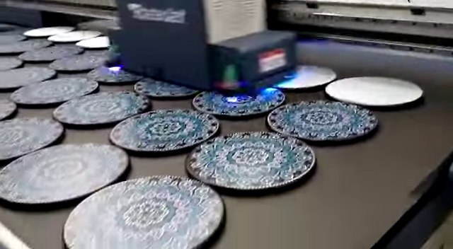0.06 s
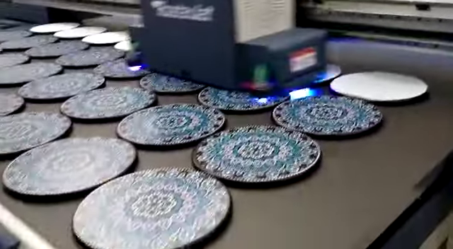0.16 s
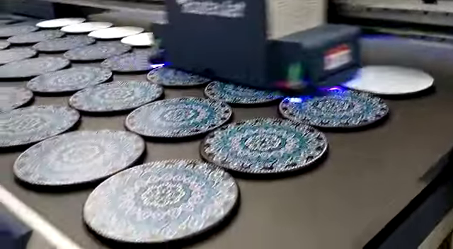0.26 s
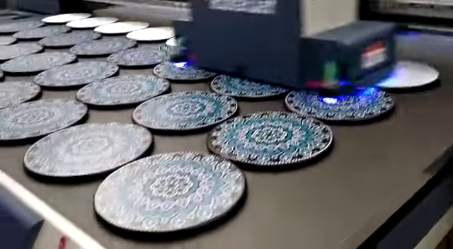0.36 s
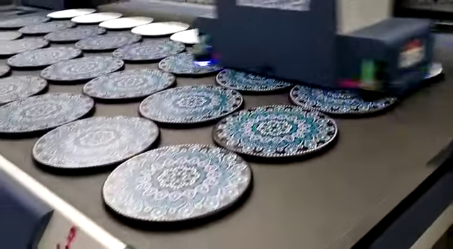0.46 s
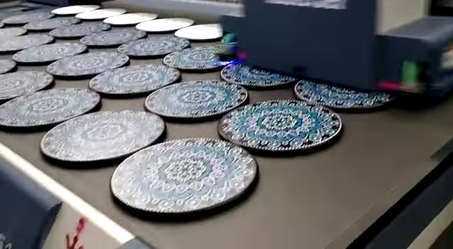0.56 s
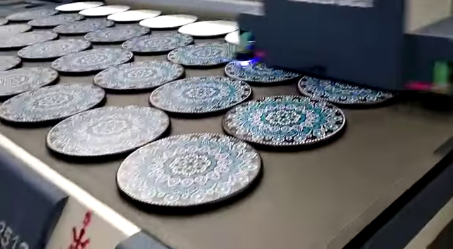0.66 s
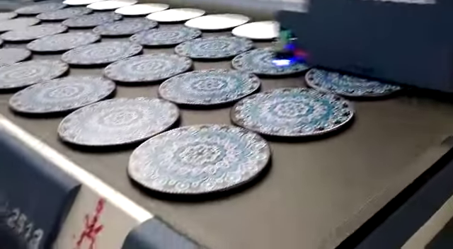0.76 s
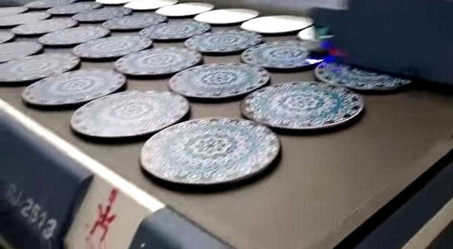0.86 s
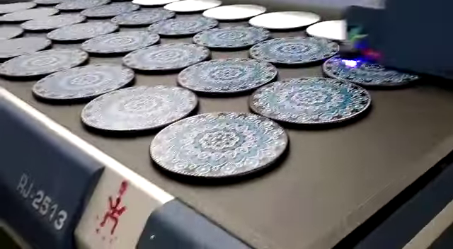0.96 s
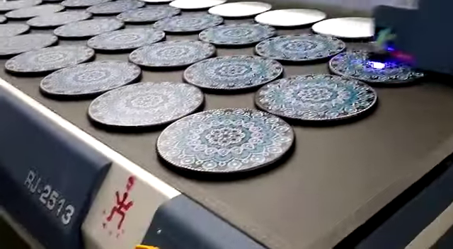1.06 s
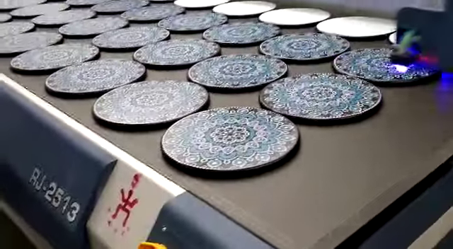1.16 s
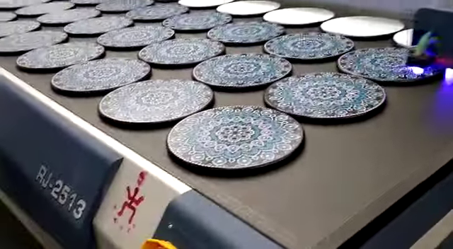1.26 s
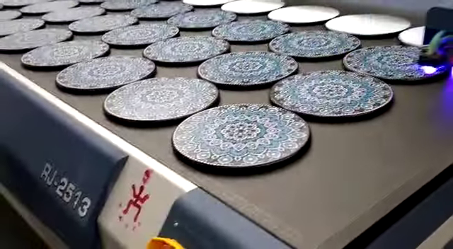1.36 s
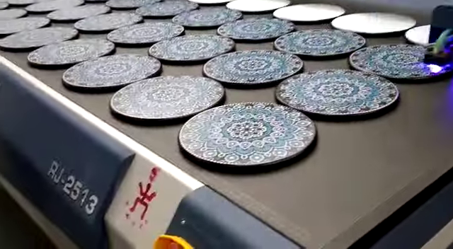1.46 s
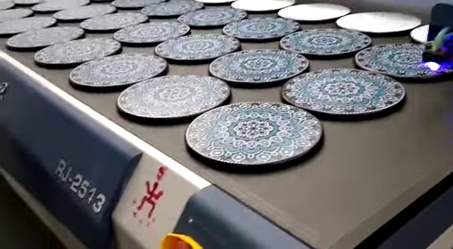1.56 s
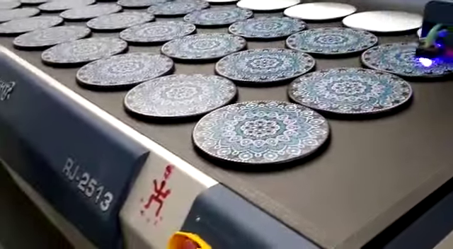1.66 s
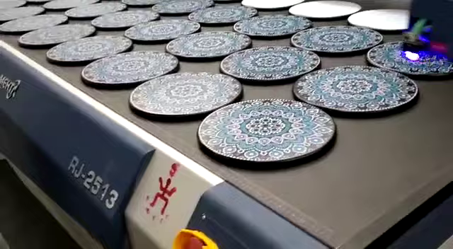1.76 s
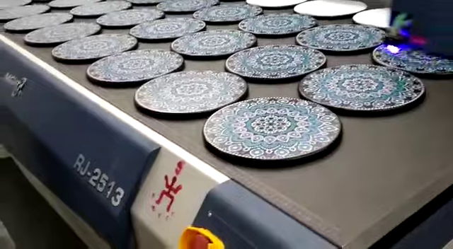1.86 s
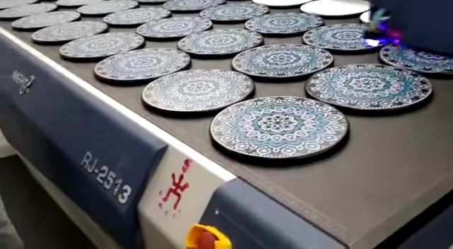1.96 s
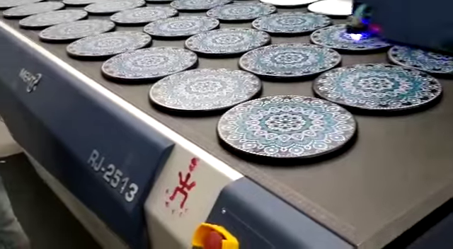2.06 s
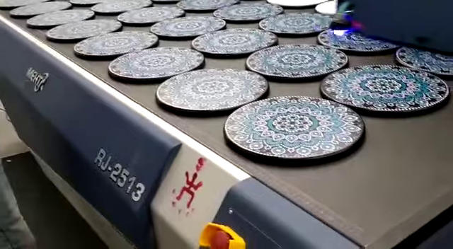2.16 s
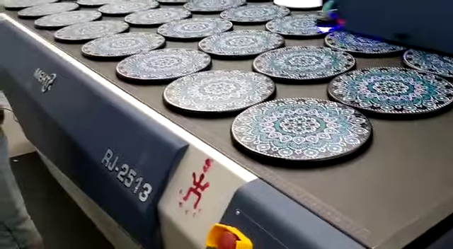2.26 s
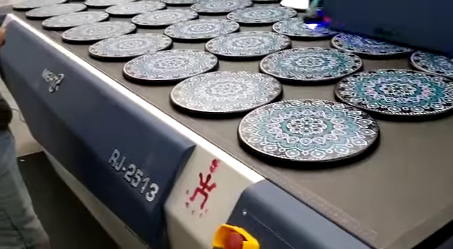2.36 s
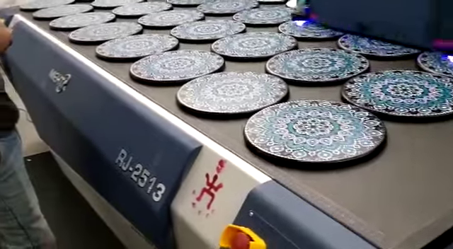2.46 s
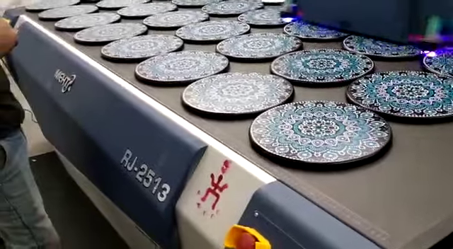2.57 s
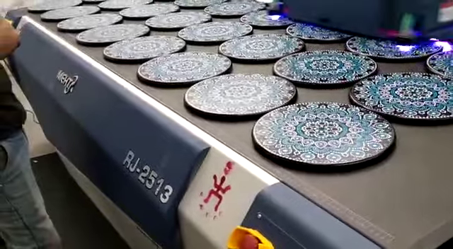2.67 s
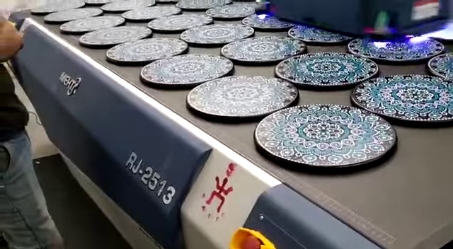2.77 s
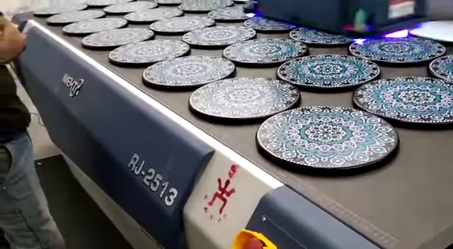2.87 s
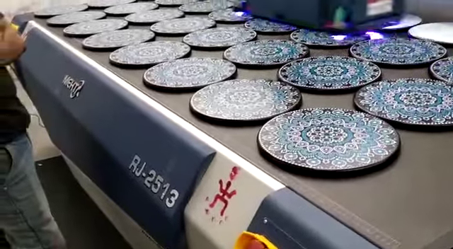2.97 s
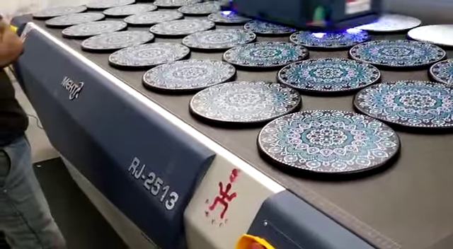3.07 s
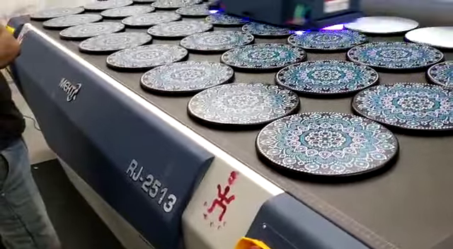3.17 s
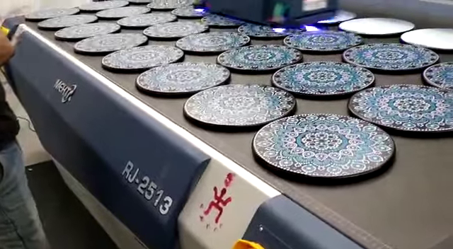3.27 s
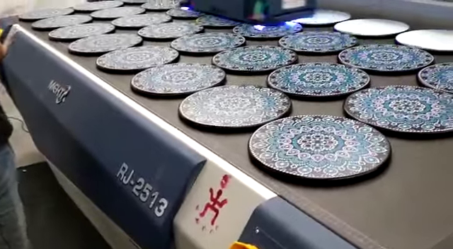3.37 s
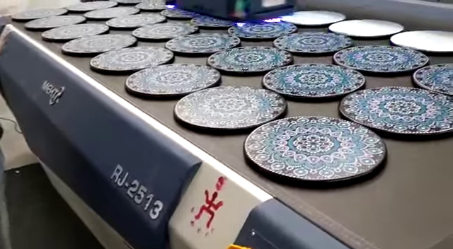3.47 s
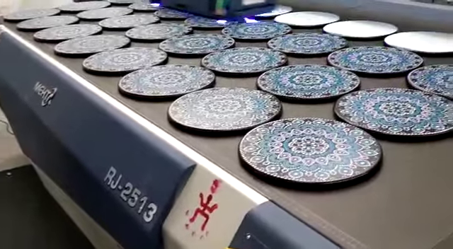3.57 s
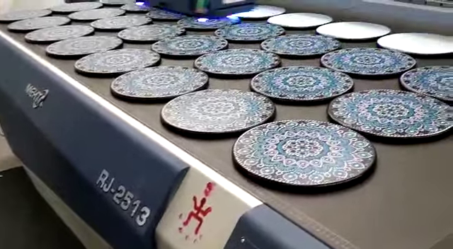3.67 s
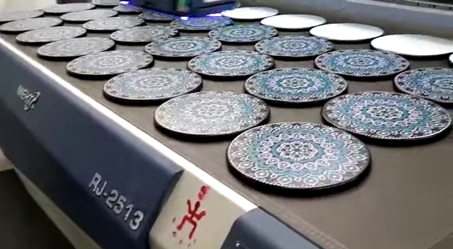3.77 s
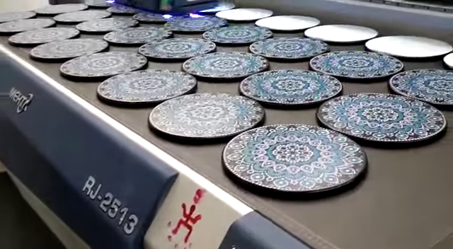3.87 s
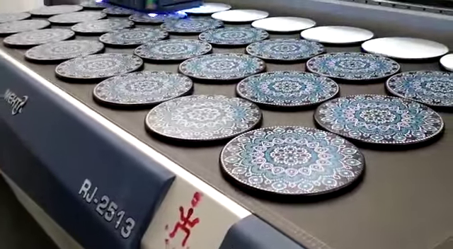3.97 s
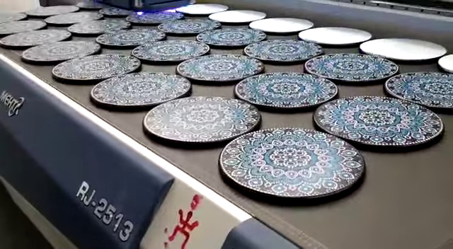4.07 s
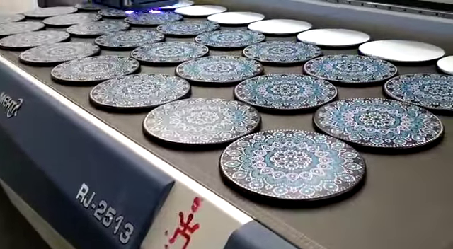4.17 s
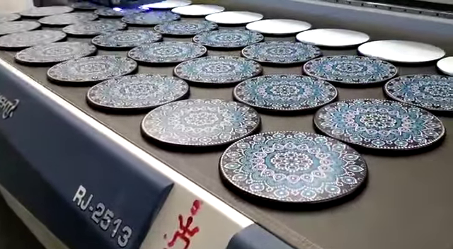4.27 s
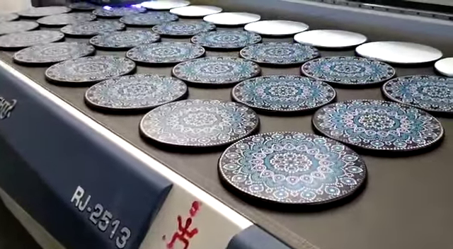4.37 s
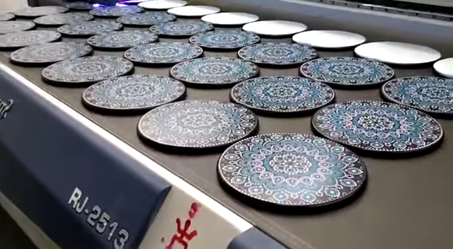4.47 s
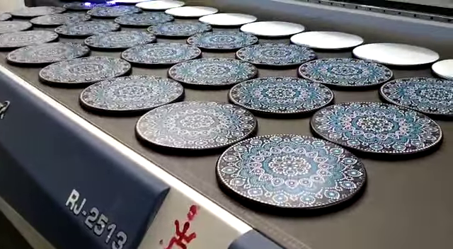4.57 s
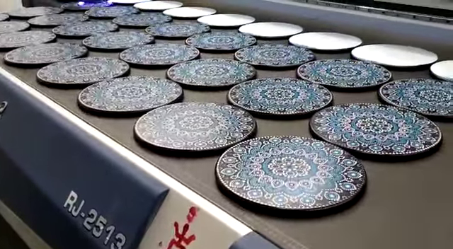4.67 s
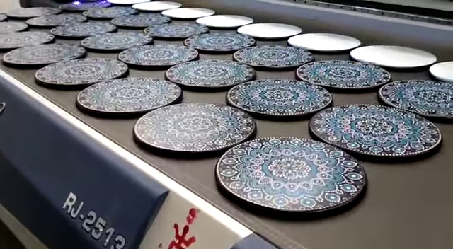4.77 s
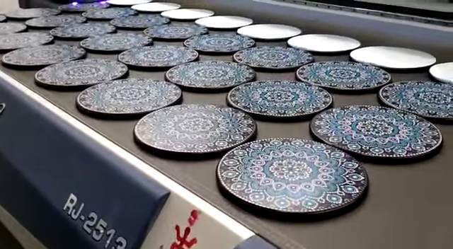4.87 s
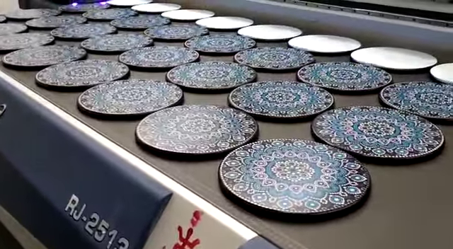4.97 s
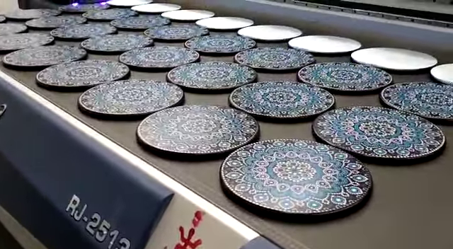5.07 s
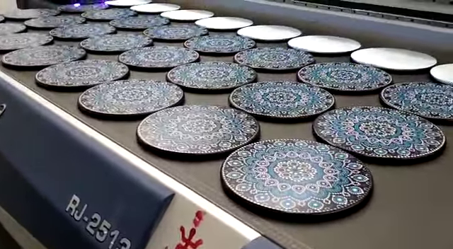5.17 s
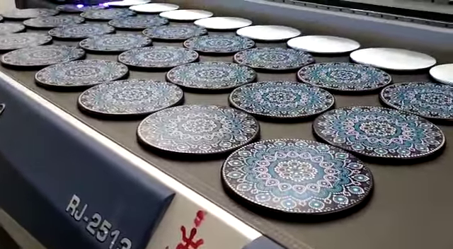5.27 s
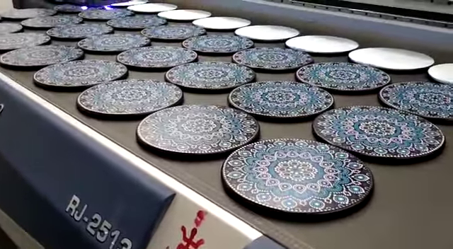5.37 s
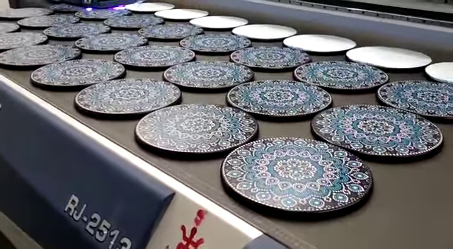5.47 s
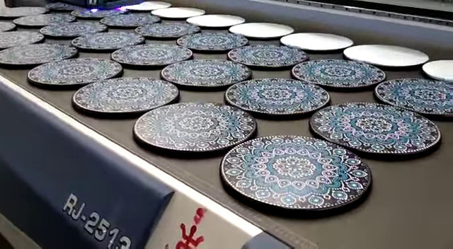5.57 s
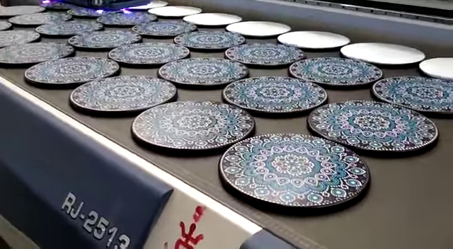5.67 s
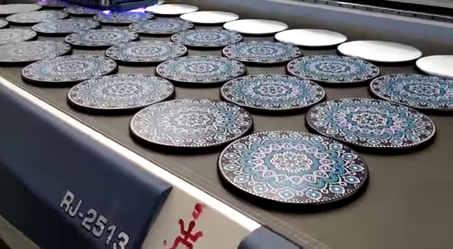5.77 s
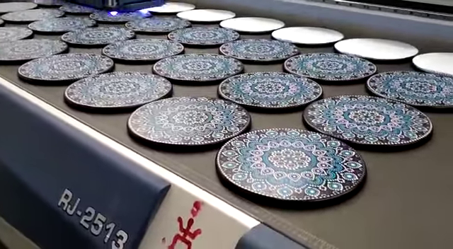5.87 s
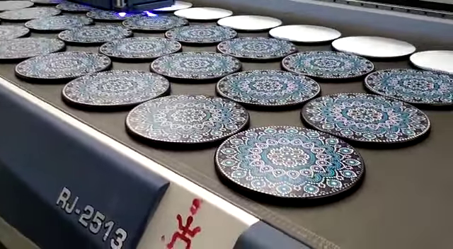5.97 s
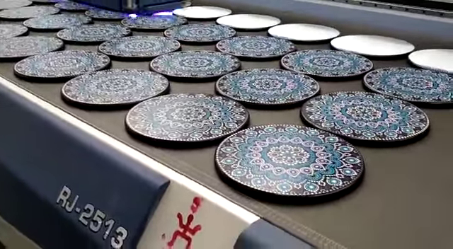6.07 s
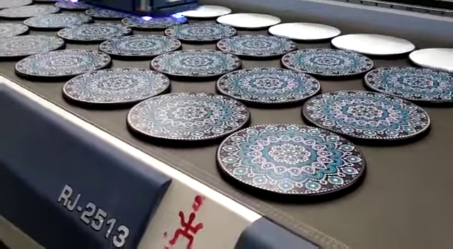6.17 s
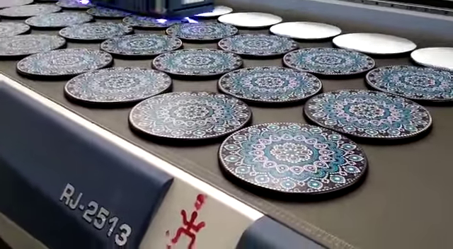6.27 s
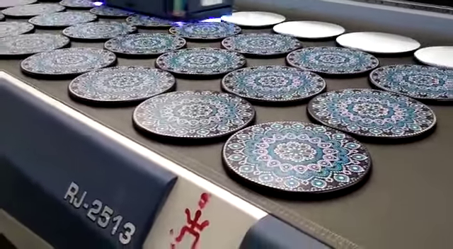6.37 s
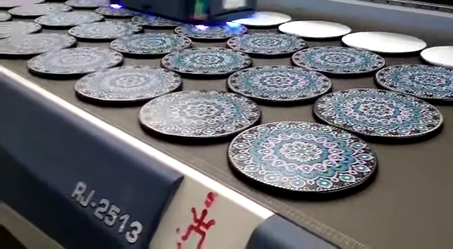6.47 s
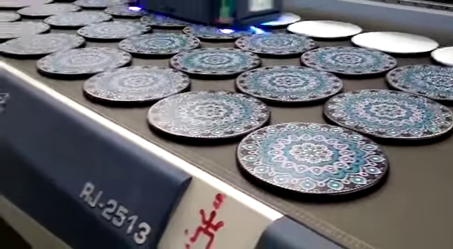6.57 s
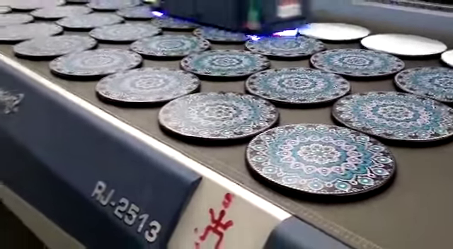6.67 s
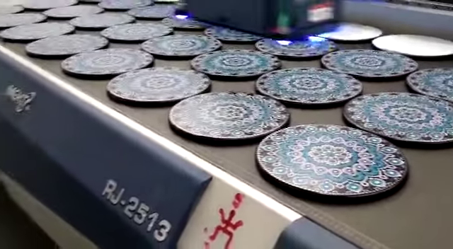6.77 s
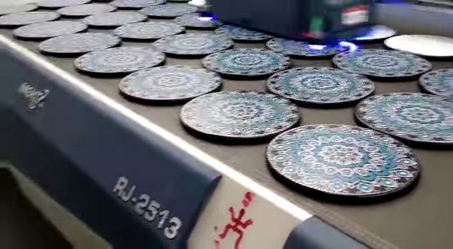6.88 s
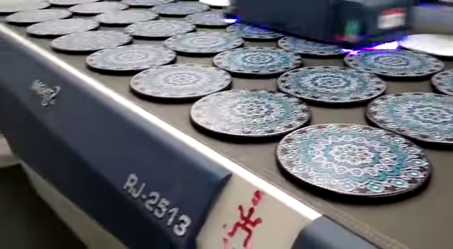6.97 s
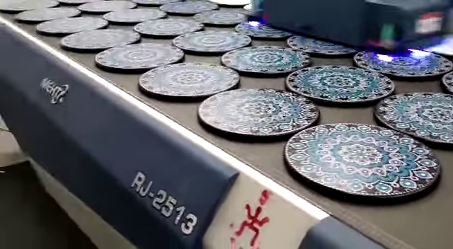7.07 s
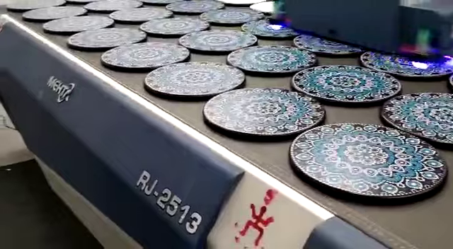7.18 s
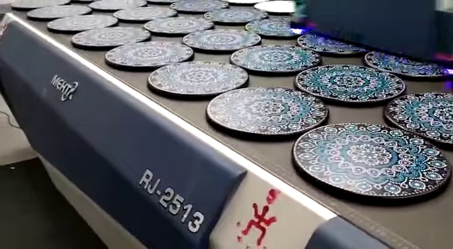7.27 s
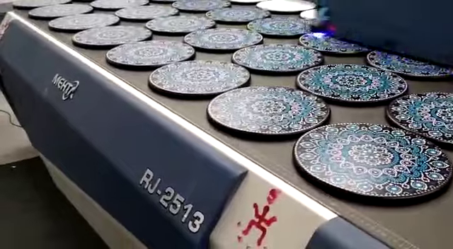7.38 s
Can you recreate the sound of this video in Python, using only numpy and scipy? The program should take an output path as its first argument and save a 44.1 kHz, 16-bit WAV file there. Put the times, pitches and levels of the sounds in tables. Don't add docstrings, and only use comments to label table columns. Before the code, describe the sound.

A printing machine's moving carriage dominates: a clean mid-low hum, sharp airy hiss, light rolling rumble and faint metallic ringing. The hum sinks in pitch and the hiss thins at two reversals, near then far, each followed by a rough, rumbling run-up. Behind it, high inverter lines fade in and out over a deep fan drone and soft room air, heard by one nearby low-bandwidth microphone.

```python
import sys
import numpy as np
from scipy import signal
from scipy.fft import rfft, irfft, next_fast_len
from scipy.io import wavfile
from scipy.ndimage import uniform_filter1d

SR = 44100
rng = np.random.default_rng(int(sys.argv[2]) if len(sys.argv) > 2 else 0)


def attenuation_scalar(level_db):
    decades = np.asarray(level_db, float) / 20
    return 10 ** decades


def master_out(mix):
    frames = np.transpose(np.atleast_2d(mix))
    ceiling = np.clip(frames, -1, 1)
    pcm = np.round(ceiling * 32767).astype(np.int16)
    wavfile.write(sys.argv[1], SR, pcm)


N = 327663


def rms_one(x):
    return x / np.sqrt(np.mean(x ** 2) + 1e-20)


def drift(rate_hz):
    r = np.exp(-80 * np.pi * rate_hz / SR)
    noise = rng.standard_normal(N // 40 + 2002)
    slow = signal.lfilter([1], [1, -2 * r, r * r], noise)[2000:]
    return np.interp(np.arange(N) / 40, np.arange(len(slow)), rms_one(slow))


def swells(rows):
    t = np.arange(N) / SR
    return sum(height * np.exp(-((t - s) / length_s) ** 2) for s, height, length_s in rows)


def tone(hz, wander_rad=0.):
    cycles = np.cumsum(hz * np.ones(N)) / SR + rng.random()
    return np.sqrt(2) * np.sin(2 * np.pi * cycles + wander_rad)


def coloured(spectrum, patchy_db, rate_hz, count):
    size = next_fast_len(N)
    log_hz = np.log(np.arange(size // 2 + 1) * SR / size + 1)
    hz, level_db = np.transpose(spectrum)
    points = np.log(hz)
    density = attenuation_scalar(np.interp(log_hz, points, level_db, left=-150))
    shaped = rfft(rng.standard_normal(size)) * density * np.sqrt(SR / 2)
    centres = np.linspace(points[0], points[-1], count)
    out = np.zeros(N)
    for row in np.eye(count):
        band = irfft(shaped * np.interp(log_hz, centres, row), size)[:N]
        out += band * attenuation_scalar(patchy_db * drift(rate_hz))
    return out


def resonant(modes):
    out = np.zeros(N)
    for hz, width_hz, level_db in modes:
        r = np.exp(-np.pi * max(width_hz, 1) / SR)
        a = [1, -2 * r * np.cos(2 * np.pi * hz / SR), r * r]
        once = signal.lfilter([1, 0, -1], a, rng.standard_normal(N + SR))
        rung = signal.lfilter([1], a, once)
        out += attenuation_scalar(level_db) * rms_one(rung[SR:])
    return out


def level(law, motion):
    db, far_db, away_db, still_db, load_db = law
    speed, place, away, load = motion
    return db + far_db * place + away_db * away + still_db * (1 - speed ** 2) + load_db * load * speed


# [standstill t/s, braking/s, run-up/s, braking ease exponent, run-up ease exponent]
REVERSALS = [
    (1.58, .61, .58, 1.45, 1.85),
    (5.1, .54, .48, 1.0, 1.35),
]
CREEP = .03
SNAG_S, SNAG_LENGTH_S, SNAG_LOSS = 5.625, .03, .07
RAIL_S = 3.0


def carriage():
    t, speed = np.arange(N) / SR, np.ones(N)
    for s, brake_s, run_up_s, brake_ease, run_up_ease in REVERSALS:
        ramp = np.where(t < s, (s - t) / brake_s, (t - s) / run_up_s)
        slowing = (1 - np.clip(ramp, 0, 1)) ** np.where(t < s, brake_ease, run_up_ease)
        speed = speed - (1 - CREEP) * slowing
    speed = uniform_filter1d(speed - swells([(SNAG_S, SNAG_LOSS, SNAG_LENGTH_S)]), SR // 50)
    away = 1. * (t > REVERSALS[0][0]) * (t < REVERSALS[1][0])
    travel = np.cumsum(speed * (2 * away - 1)) / SR / RAIL_S
    load = uniform_filter1d(np.gradient(speed) * SR, SR // 10)
    return speed, travel - travel.min(), uniform_filter1d(away, SR // 5), load


# [t/s, level/dB]
BELT_LEVEL = [(0.0, -19), (0.02, -28), (0.66, -25), (0.74, -28), (1.12, -28.5), (1.18, -32), (1.9, -49),
              (2.01, -31), (3.35, -33), (4.14, -38.5), (4.63, -32), (5.01, -42), (5.48, -40.5),
              (5.57, -29.5), (5.88, -31), (6.99, -29), (7.22, -35), (7.43, -34)]
# [t/s, change/dB, length/s]
BELT_JERKS = [(.04, -5, 0.059), (.76, -8, 0.027), (.91, -17, 0.012), (.99, -11, 0.016), (1.21, -5, 0.057),
              (1.28, 1, 0.014), (1.36, 8, .03), (1.78, 13, 0.018), (2.15, -11, 0.018), (2.56, 4.5, 0.019),
              (2.69, 4, 0.015), (2.84, 4, 0.027), (2.89, -9, 0.024), (3.25, 1, 0.23), (3.54, 5, .025),
              (4.3, 3.5, .025), (4.39, 3, 0.023), (4.53, 4, 0.021), (4.59, -7, 0.015), (4.62, 3.5, 0.02),
              (4.7, 5.5, .04), (4.78, 5, 0.026), (5.32, 9, 0.015), (5.71, 5.5, 0.011), (6.15, -4, .04),
              (6.38, 3, .04), (6.7, -1.5, .04), (6.78, 1.5, .03), (7.08, -4.5, .03), (7.37, -9, 0.017),
              (7.4, 8, 0.016)]
# [f/Hz, width/Hz, level/dB]
FRAME_MODES = [(318, 40, -5), (356, 35, 0), (385, 45, -4)]
TOOTH_HZ, PULLEY_TEETH = 400.1, 13
BELT_FLUTTER_DB = 0.5


def belt(speed):
    level_db = np.interp(np.arange(N) / SR, *np.transpose(BELT_LEVEL))
    level_db = level_db + swells(BELT_JERKS) + BELT_FLUTTER_DB * drift(7)
    heard = np.clip((speed - .8) / .06, 0, 1)
    load = np.clip((1 - speed) / .25, 0, 1) * np.clip(speed / .6, .35, 1)
    depth = .08 + .34 * np.clip((1 - speed) / .03, 0, 1)
    throb = 1 + depth * tone(TOOTH_HZ / PULLEY_TEETH * speed, 1.8 * drift(6))
    mesh = throb * tone(TOOTH_HZ * speed, .25 * drift(12)) * attenuation_scalar(1.2 * drift(22))
    second = attenuation_scalar(-20 + 22 * load) * tone(2 * TOOTH_HZ * speed, 1.1 * drift(9))
    shudder = (0.079 + 0.61 * load * (1 - 1.1 * heard)) * rms_one(resonant(FRAME_MODES))
    return attenuation_scalar(level_db) * (heard * (mesh + second) + shudder)


# [f/Hz, density/(dB per Hz)]
HISS = [(2400, -52.5), (3000, -43.5), (3700, -27.5), (4600, -25), (5600, -16.5), (6300, -6), (7000, 1),
        (7500, 2.5), (7720, -0.5), (7950, -10.5), (8100, -19.5)]
RUMBLE = [(150, -21), (300, 1.5), (500, 4.5), (800, 5.5), (1000, -4), (1400, -12), (2000, -27), (2600, -29),
          (3600, -46)]
# [f/Hz, width/Hz, level/dB]
COVER_MODES = [(1022, 98, -2.5), (1091, 46, -3), (1117, 15, -2.5), (1189, 60, -1), (1296, 90, -10.5),
               (1452, 50, -4), (1499, 12, -6.5), (1535, 33, -10.5), (1592, 49, -7)]
# [full-speed level/dB, far-end gain/dB, running-away gain/dB, standstill gain/dB, gain/(dB per load)]
HISS_LAW = (-26.5, 1, -0.52, -13, 0.3)
RUMBLE_LAW = (-34.5, -4.5, -2, -7.0, 5.0)
COVER_LAW = (-44.5, -1.5, 6.5, -11, 0.5)
IDLER_LAW = (-45, -9.5, -7.5, -29, -4)
# [t/s, change/dB, length/s]
HISS_SWELLS = [
    (0.0, 1.5, 0.11),
    (.8, -1.2, .15),
    (2.08, 0.5, 0.11),
    (3.05, 1, 0.22),
    (7.3, -2, .1),
]
RUMBLE_SWELLS = [
    (.05, 3.5, 0.12),
    (2.27, 5.5, 0.11),
    (5.7, 7, 0.12),
]
IDLER_SWELLS = [
    (.2, 6, 0.043),
    (.39, 9, 0.045),
    (.62, 6, 0.091),
    (.9, 13, 0.043),
    (6.88, 7, .04),
    (7.3, 9.5, .17),
]
IDLER_HZ = 204.3


def rail(motion):
    speed, place, away, load = motion
    loaded = speed, place, away, np.abs(load)
    hiss_db = level(HISS_LAW, motion) + swells(HISS_SWELLS) + .4 * drift(4)
    rumble_db = level(RUMBLE_LAW, loaded) + swells(RUMBLE_SWELLS) + 1.1 * drift(4.6)
    cover_db = level(COVER_LAW, loaded) + 1.5 * drift(3.3)
    idler_db = level(IDLER_LAW, motion) + swells(IDLER_SWELLS) + 2.2 * drift(12)
    hiss = attenuation_scalar(hiss_db + 0.8) * rms_one(coloured(HISS, patchy_db=0.86, rate_hz=36, count=16))
    rolling = rms_one(coloured(RUMBLE, patchy_db=2.2, rate_hz=6, count=8))
    rumble = attenuation_scalar(rumble_db - 4.0) * speed ** 0.75 * rolling
    cover = attenuation_scalar(cover_db - 2.5) * speed * rms_one(resonant(COVER_MODES))
    idler = attenuation_scalar(idler_db - 1.5) * tone(IDLER_HZ * speed, 0.9 * drift(6))
    return hiss + rumble + cover + speed ** 3 * idler


# [multiple of pass rate, level re buzz/dB]
BALL_ORDERS = [(12, -7.5), (13, -11.5), (14, -12), (15, -18)]
# [f/Hz, density/(dB per Hz)]
BUZZ = [(1450, -15), (1650, -2), (2000, -6), (2400, -10), (3100, -19), (3600, -15.5), (4000, -30.5)]
BUZZ_LAW = (-56.5, 5, -1.8, -6.5, 1)
LOWEST_BALL_LAW = (-53.5, -1.5, 2.5, -2, -7.5)
# [t/s, change/dB, length/s]
BUZZ_SWELLS = [
    (.3, 4, .15),
    (4.08, 4.5, 0.2),
    (5.37, 8, 0.055),
    (5.64, 5, .14),
]
LOWEST_SWELL = [
    (.25, 13, .08),
]
BALL_PASS_HZ = 143.2


def balls(motion):
    speed = motion[0]
    buzz_db = level(BUZZ_LAW, motion) + swells(BUZZ_SWELLS) + 1.3 * drift(3.1)
    lowest_db = level(LOWEST_BALL_LAW, motion) + swells(LOWEST_SWELL) + 3 * drift(4.5)
    lines = np.zeros(N)
    for order, db in BALL_ORDERS:
        pitch_hz = round(order) * BALL_PASS_HZ * speed
        lines += attenuation_scalar(db + 3.0 * drift(6)) * tone(pitch_hz, 1.2 * drift(7))
    lowest = attenuation_scalar(lowest_db - 4.5) * tone(10 * BALL_PASS_HZ * speed, 1.1 * drift(6.1))
    buzz = 0.55 * rms_one(coloured(BUZZ, patchy_db=1.0, rate_hz=9, count=4))
    return attenuation_scalar(buzz_db) * (buzz + speed ** 3 * lines) + speed ** 3 * lowest


# [mains steps from carrier, level/dB]
COMB = [(-3, -47.9), (-2, -49.1), (-1, -44.6), (0, -49.8), (1, -43.4), (2, -41.0), (3, -48.5), (4, -49.7)]
FAINT_LINES = [(-6, -55), (-5, -58), (-4, -51), (5, -58)]
# [t/s, mains steps from carrier, change/dB, length/s]
CRESTS = [(0.1, 1, 14.0, 0.12), (0.3, -1, 11.5, 0.1), (0.39, 2, 11.2, 0.15), (0.44, -2, 15.9, 0.52),
          (0.68, -3, 10.5, 0.25), (1.21, 2, 10.1, 0.27), (1.34, -1, 12.2, 0.28), (1.37, 3, 14.9, 0.9),
          (1.42, 1, 7.6, 0.26), (1.52, -2, 17.9, 0.35), (2.29, -3, 11.5, 0.29), (2.36, 2, 8.3, 0.28),
          (2.45, -2, 10.6, 0.25), (2.87, -1, 9.2, 0.7), (3.09, 2, 5.3, 0.49), (3.11, 1, 7.0, 0.2),
          (3.2, -2, 12.5, 0.16), (3.85, 1, 7.8, 0.17), (3.95, 2, 7.8, 0.15), (4.1, -2, 15.1, 0.11),
          (4.3, 3, 10.0, 0.35), (4.42, 1, 11.0, 0.28), (4.47, -3, 7.3, 0.39), (5.02, -1, 7.0, 0.15),
          (5.34, 2, 11.1, 0.34), (5.73, -1, 10.9, 0.63), (6.56, 3, 10.9, 0.48), (6.92, -3, 7.9, 0.3),
          (6.93, -2, 14.2, 0.9), (6.94, 0, 10.1, 0.78)]
# [t/s, change/dB, length/s]
COMB_SWELLS = [
    (0.0, 4.5, 0.14),
    (6.15, 2, 0.22),
    (7.4, 3.5, 0.1),
]
CARRIER_HZ, MAINS_HZ = 6403.3, 50.08
COMB_FADE_DB = 0.9


def inverter():
    levels = []
    for step, db in COMB:
        crests = [(s, up_db, length_s) for s, n, up_db, length_s in CRESTS if round(n) == round(step)]
        levels.append((round(step), db + COMB_FADE_DB * drift(1.5) + swells(crests)))
    levels += [(step, db + 3 * drift(2)) for step, db in FAINT_LINES]
    lines = np.zeros(N)
    for step, db in levels:
        lines += attenuation_scalar(db + 1.3 * drift(4.5)) * tone(CARRIER_HZ + step * MAINS_HZ, 1.44 * drift(1.0))
    return attenuation_scalar(0.47 + swells(COMB_SWELLS)) * lines


# [f/Hz, width/Hz, level/dB]
DRONES = [(262.7, 10, -55.5), (290.8, 5, -57.5), (298.2, 3.6, -51.5), (365.4, 18, -46), (528, 6.1, -53)]
# [f/Hz, wander rate/Hz, level/dB]
LOW_DRONES = [(74.7, 12, -2), (100.6, 3.5, -3.5), (147.8, 9.8, -2)]
# [f/Hz, density/(dB per Hz)]
SHOP_AIR = [(18, -76.5), (60, -75.5), (100, -71.5), (126, -81.5), (170, -71.5), (330, -64.5), (550, -67.5),
            (900, -68), (1300, -76), (2000, -88.5), (2900, -94), (4000, -86.5), (5600, -81.5),
            (6400, -70.5)]
# [t/s, change/dB, length/s]
JOGS = [
    (4.12, 6, .04),
    (4.2, -3, .03),
    (5.42, 4, .06),
    (5.5, -12, .025),
    (5.6, 4, .06),
    (5.83, -3, .04),
    (6.05, 0.5, .1),
]
SHAFT_HZ, SHAFT_DB = 47.93, -37.5
LOW_DRONE_DB, LOW_DRONE_RISE_DB_PER_S = -54.5, .8


def blower():
    shaft_db = SHAFT_DB + swells(JOGS) + .8 * drift(4)
    low_db = LOW_DRONE_DB + LOW_DRONE_RISE_DB_PER_S * np.arange(N) / SR
    rush = coloured(SHOP_AIR + [(7400, -73.5), (8100, -84)], patchy_db=1.02, rate_hz=5, count=10)
    low = np.zeros(N)
    for hz, rate_hz, db in LOW_DRONES:
        low += attenuation_scalar(db + 2.5 * drift(7.0)) * tone(hz, .5 * drift(rate_hz))
    shaft = attenuation_scalar(shaft_db + 0.96 * drift(25)) * tone(SHAFT_HZ, .15 * drift(1.5))
    return shaft + attenuation_scalar(low_db) * low + resonant(DRONES) + rush


def scene():
    motion = carriage()
    mix = belt(motion[0]) + rail(motion) + balls(motion) + inverter() + blower()
    return mix[None, :]


def band_limit(x):
    return signal.sosfilt(signal.butter(12, 9030, fs=SR, output="sos"), x)


# [f/Hz, level/dB]
MIRROR = [(8000, -1), (8250, -14.5), (8420, -29.5), (8520, -36.5), (8570, -89)]
RECORDER_RATE_HZ = 16000


def record(dry):
    size = next_fast_len(N)
    hz = np.arange(size // 2 + 1) * SR / size
    below = hz < RECORDER_RATE_HZ / 2
    kept = irfft(rfft(dry, size) * below, size)
    folded = kept * 2 * np.cos(2 * np.pi * RECORDER_RATE_HZ * np.arange(size) / SR)
    fade = attenuation_scalar(np.interp(hz, *np.transpose(MIRROR), right=-200))
    mirror = irfft(rfft(folded) * ~below * fade, size)
    return band_limit((kept + mirror)[:, :N])


dry = scene()
out = record(dry)
master_out(out)
```